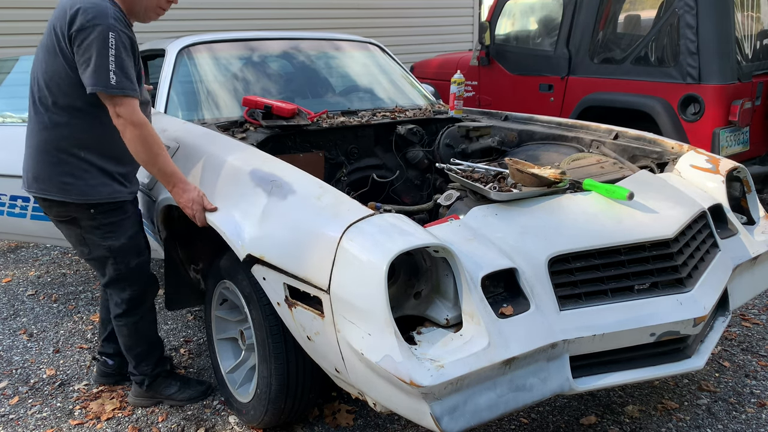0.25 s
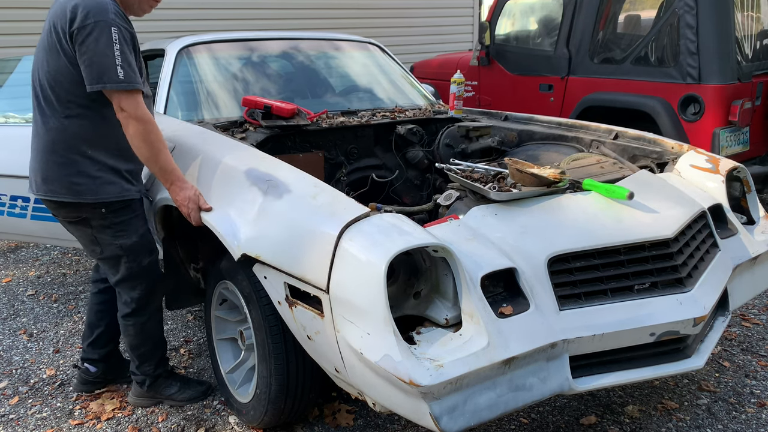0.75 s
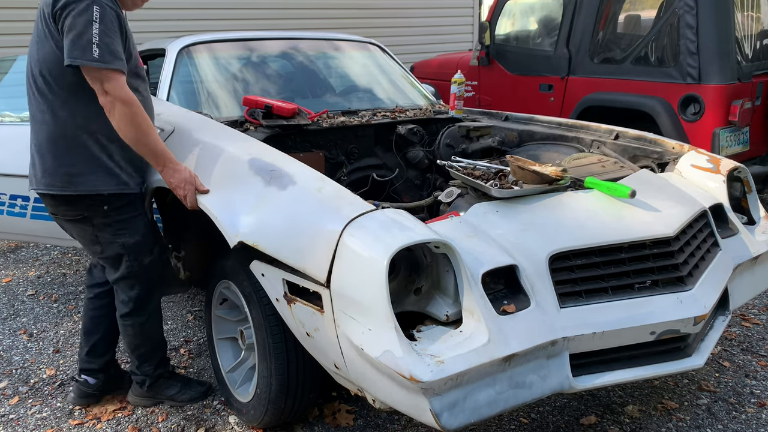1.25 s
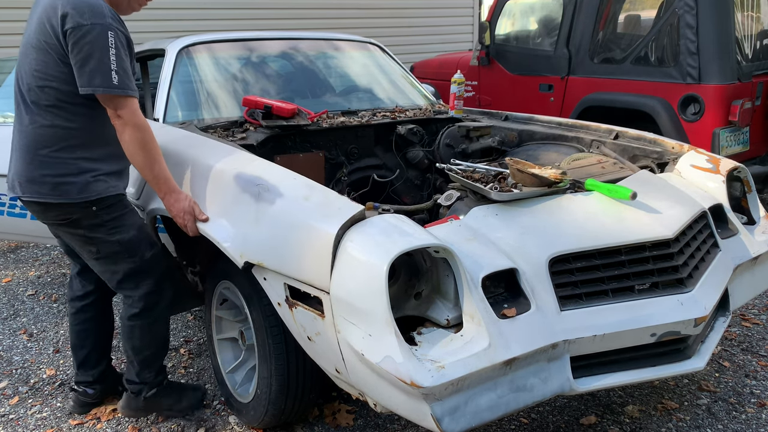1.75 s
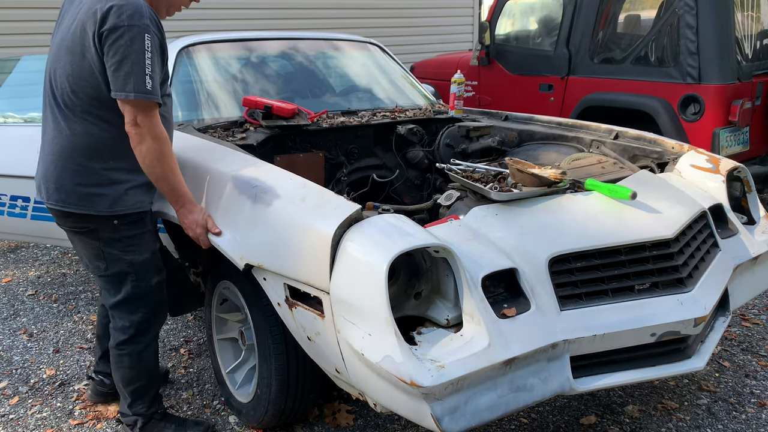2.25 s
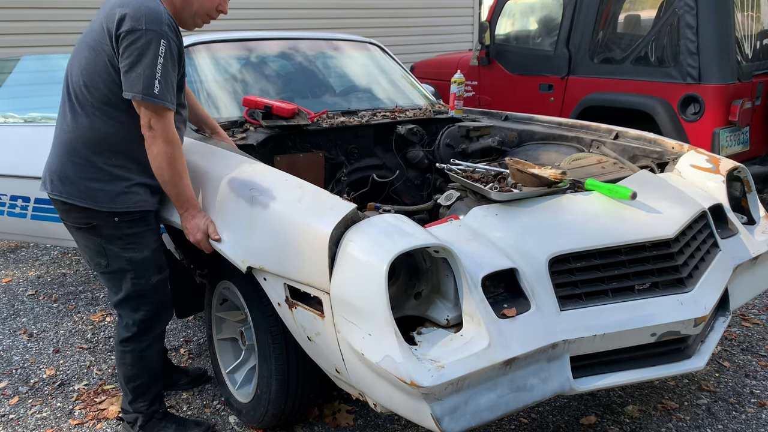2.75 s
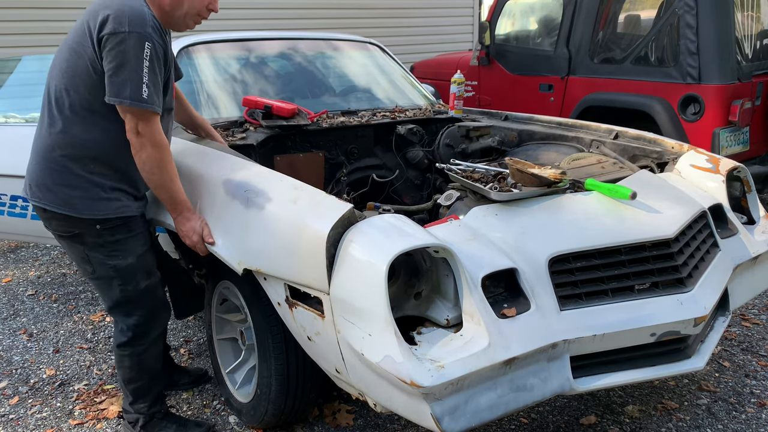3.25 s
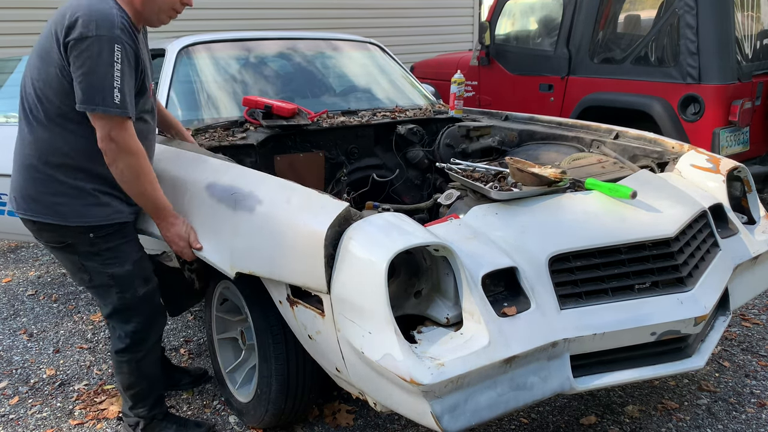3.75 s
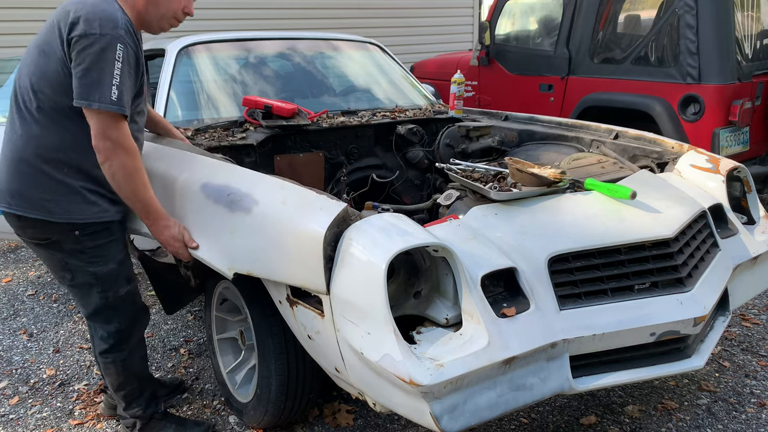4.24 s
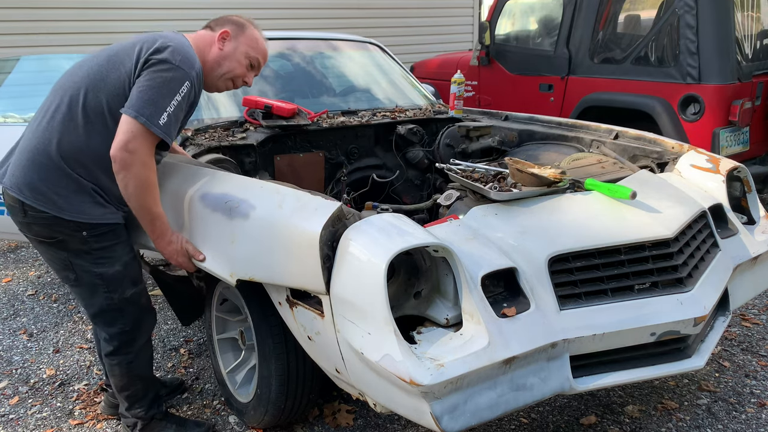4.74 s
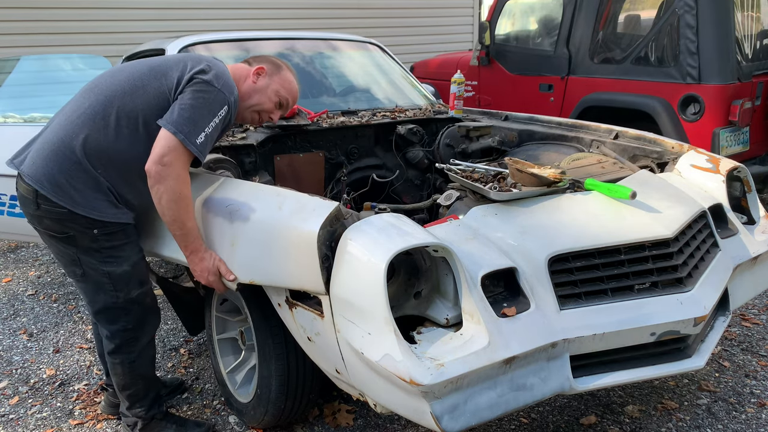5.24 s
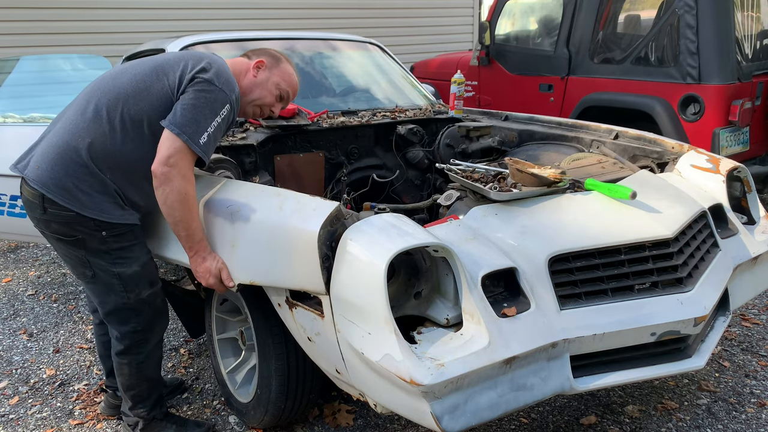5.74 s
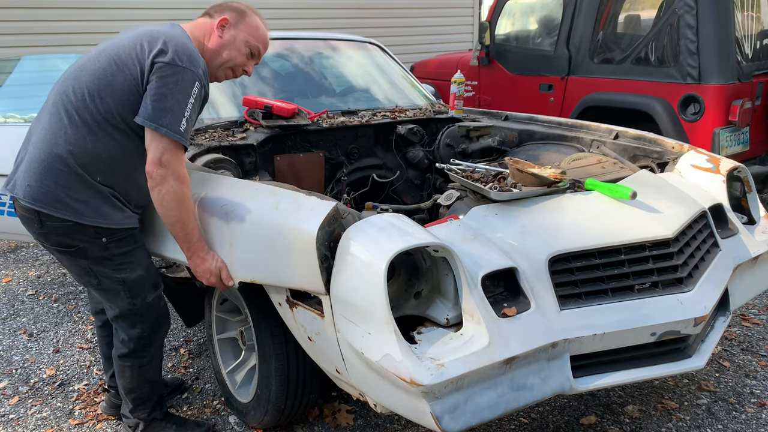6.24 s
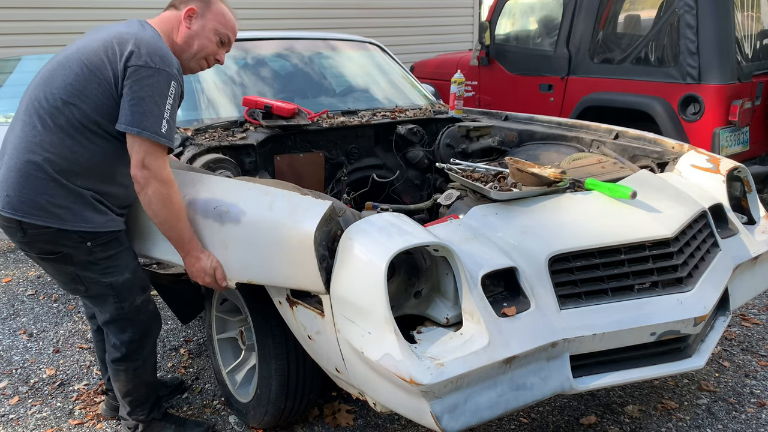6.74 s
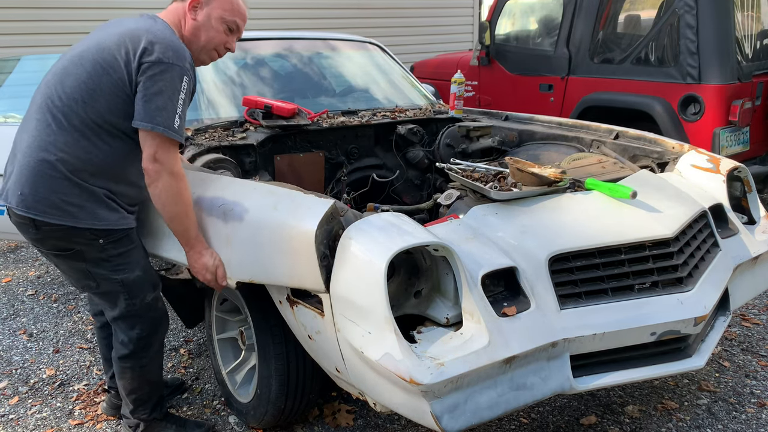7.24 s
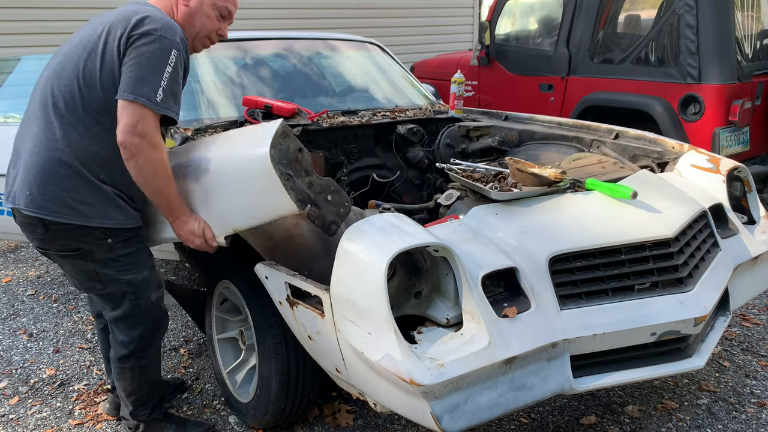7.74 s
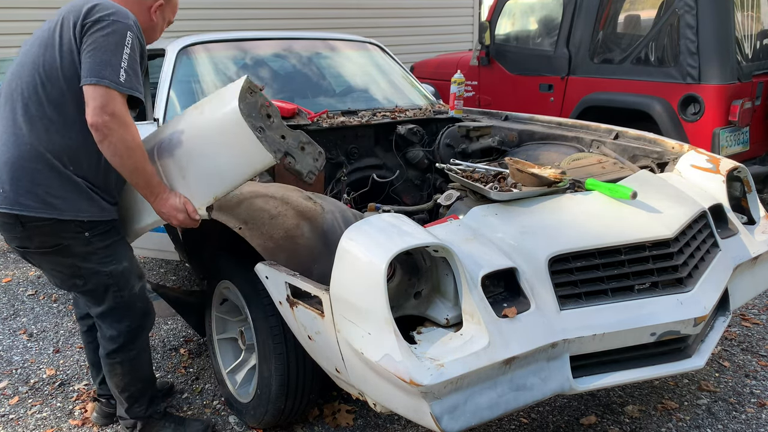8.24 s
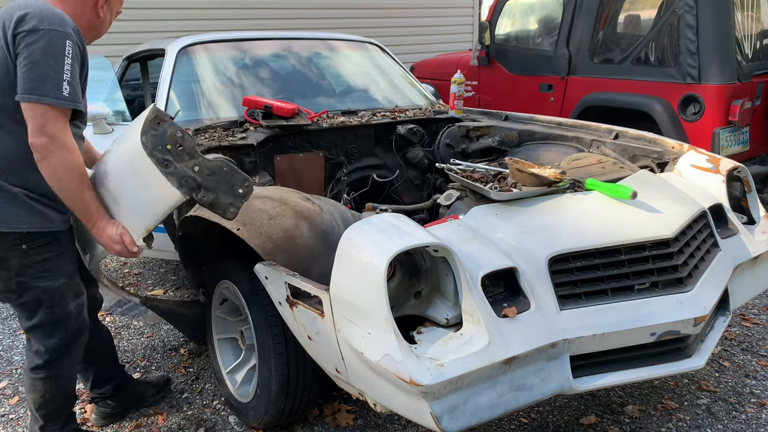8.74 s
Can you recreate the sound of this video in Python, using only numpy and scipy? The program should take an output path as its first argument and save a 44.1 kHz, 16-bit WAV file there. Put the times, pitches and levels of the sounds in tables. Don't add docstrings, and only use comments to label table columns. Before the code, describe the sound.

Rough bursts of sheet metal knocking and grating, a ratchety creak, heavy hollow thumps, then a loud final clank and faint rustles in a quiet yard.

```python
import sys
import numpy as np
from scipy import signal
from scipy.fft import rfft, irfft, next_fast_len
from scipy.io import wavfile
from scipy.ndimage import uniform_filter1d, map_coordinates

SR = 44100
rng = np.random.default_rng(int(sys.argv[2]) if len(sys.argv) > 2 else 0)


def boost_factor(decibels):
    exponent = np.asarray(decibels, float) / 20
    return 10 ** exponent


def int16_out(signal):
    q = np.round(np.clip(np.atleast_2d(signal).T, -1, 1) * 32767)
    wavfile.write(sys.argv[1], SR, q.astype(np.int16))


N = 396459
T = np.arange(N) / SR

# (f/Hz, level/dB per Hz)
STEEL = [(24, -40.5), (40, -5.5), (69, -2.5), (170, -3.5), (243, 3), (306, -2.5), (377, 1), (598, -6),
         (753, -5.5), (872, -12.5), (1170, -13.5), (2440, -22.5), (6000, -13), (7800, -72.5), (13200, -120)]
# (f/Hz, level/dB per Hz)
GRIT = [(3000, -38), (5000, -39.5), (6500, 6), (9000, 8.5), (12000, 3), (15500, 2.5), (16400, -7)]
# (f/Hz, share of the t60)
DAMPING = [(60, 1), (300, 0.56), (1500, 0.89), (5000, 0.035), (12000, 0.29)]


def unit(x):
    return x / np.sqrt(np.mean(x ** 2) + 1e-20)


def along(points, hz):
    f, v = np.transpose(points)
    return np.interp(np.log(hz + 1), np.log(f + 1), v)


def wobble(rate):
    return map_coordinates(rng.standard_normal(int(N * rate / SR) + 4), [T * rate])


def filtered(x, response):
    m = next_fast_len(x.shape[-1] + SR // 2)
    spectrum = rfft(x, m) * response(np.fft.rfftfreq(m, 1 / SR))
    return irfft(spectrum, m)[..., :x.shape[-1]]


def band(hz, lo_hz, hi_hz):
    return 1 / np.sqrt((1 + (lo_hz / (hz + 1)) ** 8) * (1 + (hz / hi_hz) ** 8))


def add_at(out, s, sound):
    out[..., round(s * SR):][..., :sound.shape[-1]] += sound


def fading(t60, gain_db, count):
    hz, t, z = signal.stft(rng.standard_normal((count, SR // 4)), SR, nperseg=256)
    z = z * boost_factor(gain_db(hz) - 60 * t / t60(hz))
    return signal.istft(z, SR, nperseg=256)[1][:, :SR // 4]


def ringing(x, t60, count, hop_s):
    hop = round(hop_s * SR)
    padded = np.pad(x, (hop, 2 * hop))
    slices = np.lib.stride_tricks.sliding_window_view(padded, 2 * hop)[::hop]
    slices = slices * signal.get_window("hann", 2 * hop)
    tails = fading(t60, lambda hz: 0, count=count * len(slices))[:, :SR // 7]
    tails = tails.reshape(count, len(slices), -1)
    tails = tails / np.linalg.norm(tails, axis=2, keepdims=True)
    wet = signal.fftconvolve(slices[None], tails, axes=2)
    out = np.zeros((count, N + SR + 3 * hop))
    for k in range(len(slices)):
        out[:, k * hop:][:, :wet.shape[2]] += wet[:, k]
    return out[:, hop:N + hop]


def grains(per_s, spread_db, bed):
    caught = rng.random(N) < per_s * boost_factor(5 * wobble(25)) / SR
    size_db = spread_db * np.minimum(rng.exponential(size=N), 2.5)
    kicks = unit(caught * boost_factor(size_db) * rng.choice([-1, 1], N))
    return unit(kicks + bed * rng.standard_normal(N))


def strokes(rows, slopes, over):
    start, hold, db, extra_db = np.transpose(rows)[:, :, None]
    up, down = slopes
    t = T[::64]
    early, late = np.maximum(start - t, 0), np.maximum(t - start - hold, 0)
    each_db = db + over * extra_db - up * early - down * late
    return np.interp(T, t, each_db.max(0))


def ahead(x):
    return filtered(x, lambda hz: np.exp(1j * np.pi * hz * np.array([[-1], [1]]) * 5 / SR))


def air():
    # (f/Hz, level/dB per Hz)
    yard = [(25, -14.5), (40, -1), (65, 6.5), (125, 4.5), (200, -7.5), (400, -17), (1000, -20.5),
            (2500, -28.5), (5500, -29), (7300, -25), (8500, -34), (12000, -39), (16000, -36)]
    # (start t/s, end t/s, f/Hz)
    cricket = (5.47, 5.85, 4095)
    shared, own = rng.standard_normal(N), rng.standard_normal((2, N))
    turn = lambda hz: np.pi / 2 * along([(150, 0.18), (700, 0.66), (2000, 1.0)], hz)
    hum = filtered(shared, lambda hz: boost_factor(along(yard, hz)) * np.cos(turn(hz)))
    hum = hum + filtered(own, lambda hz: boost_factor(along(yard, hz)) * np.sin(turn(hz)))
    start, end, hz = cricket
    swell = np.clip(np.minimum(T - start, end - T) / .1, 0, 1)
    cycles = hz * np.cumsum(1 + .03 * (swell - 1)) / SR + .17 * wobble(140)
    trill = np.sin(2 * np.pi * cycles) * boost_factor(-66 + 4 * wobble(40))
    return boost_factor(-50.5 + 1.6 * wobble(3.46)) * unit(hum) + ahead(swell * trill)


def knocks():
    # (t/s, peak level/dB, note f/Hz,
    # sharpness/dB, t60/s)
    frame_blows = [(0.041, -27, 498, -2, 0.37), (0.086, -11, 825, -26, 0.086), (0.118, -11, 380, -16, 0.27),
                   (0.291, -15, 410, -10, 0.13), (0.332, -19, 205, -26, 0.6), (0.434, -17, 635, -27, 0.63),
                   (0.467, -9, 437, -13, 0.34), (0.63, -13, 240, -11.5, 0.15), (0.673, -9, 302, -19, 0.22),
                   (0.771, -13, 336, -17.5, 0.4), (0.819, -7.5, 388, -4.5, 0.1), (0.926, -11, 630, -7.5, 0.59),
                   (1.007, -14, 425, -8, 0.13), (1.155, -23, 441, -4, 0.29), (1.181, -6, 397, -21.5, 0.47),
                   (1.243, -8.5, 356, -5.5, 0.67), (1.305, -7, 268, -10, 0.21), (1.339, -8.5, 253, -4, 0.15),
                   (1.553, -15, 334, -17, 0.27), (1.775, -24.5, 396, -18, 0.19),
                   (2.536, 0, 312, -17, 0.18), (2.59, -16, 416, -6, 0.4), (2.978, -18.5, 352, -18, 0.85),
              (2.996, -12, 264, -14.5, 0.16), (3.188, -15, 665, -18.5, 0.25),
              (3.268, -19.5, 251, -21, 0.09), (3.337, -22, 705, -17, 0.12), (3.457, -7, 256, -18, 0.2),
              (3.513, -7.5, 357, -16, 0.22), (3.591, -16, 202, -37.5, 0.79), (3.668, -18.5, 264, -19, 0.49),
              (3.699, -11, 506, -8, 0.18), (3.798, -1.5, 474, -19.5, 0.2), (3.927, -18.5, 223, -32, 0.32),
              (4.005, -16, 466, -13.5, 0.26), (4.049, -12.5, 770, -16, 0.2), (4.14, -21, 443, -27, 0.37),
              (4.337, -26.5, 1160, -25, 0.12), (4.432, -11.5, 248, -21, 0.13),
              (4.848, -30.5, 442, -6, 0.26),
                   (5.304, -14, 327, -12.5, 0.36), (6.087, 0, 227, -22, 0.18), (6.21, -10, 422, -24, 0.13),
               (6.399, -34, 250, -40, 0.04), (6.538, -18, 204, -20.5, 0.33), (7.033, -14, 344, -16, 0.5),
               (7.111, -9.5, 460, -5, 0.74), (7.14, -9, 261, -13, 0.2), (7.176, -10, 238, -19, 0.41),
               (7.361, -9, 414, -12, 0.24), (7.416, 1, 367, -8, 0.27), (7.432, 1.5, 400, -9, 0.11),
               (7.492, -16.5, 443, -5, 0.23), (7.633, -19, 843, 0, 0.14), (7.916, -32.5, 510, -17, .32),
               (8.314, -32.5, 740, -8, 0.47), (8.492, -24, 455, -13, 0.51), (8.938, -24.5, 230, -16, 0.92)]
    # (f/Hz, level/dB, t60/s)
    panel_modes = [(73.2, -16, .5), (124.2, -11.5, 0.68), (205, -9, 0.62), (274, -12.5, 0.25),
                   (318, -2.5, 0.23), (424.4, 10.5, 0.14), (485.6, -23, 0.62), (600, -8.5, 0.097),
                   (658.7, 2.5, 0.3), (774.3, -2.5, 0.31), (983, 9.5, 0.17), (1121, 1, 0.21),
                   (1148, -7, 0.49), (1283, -7, 0.14), (1544, -5.5, 0.12), (1957, -2.5, 0.37)]
    out, t = np.zeros(N + SR), T[:SR // 4]
    blows = frame_blows
    _, _, note_hz, sharp_db, t60 = np.transpose(blows)[:, :, None, None]
    crack_db = -3.5 + 1.2 * sharp_db
    near = lambda hz, centre_hz: -9 * np.abs(np.log2((hz + 1) / centre_hz))
    body = lambda hz: boost_factor(near(hz, note_hz)) * (hz < 1500)
    rasp = lambda hz: boost_factor(along(STEEL, hz) + sharp_db + 13.0) * (hz > 1400)
    crack = lambda hz: boost_factor(along(GRIT, hz) + crack_db - 12.0)
    mix = lambda hz: body(hz) + rasp(hz) + crack(hz)
    tone_db = lambda hz: 20 * np.log10(mix(hz[:, None]) + 1e-6)
    bursts = fading(lambda hz: t60 * along(DAMPING, hz)[:, None], tone_db, count=len(blows))
    hz, level_db, lasting = np.transpose(panel_modes)[:, :, None]
    draws = rng.standard_normal((len(blows), 2, len(panel_modes), 1))
    top = lambda x: x / np.abs(x).max()
    contact, rattle = 1 - np.exp(-t / [[.0015], [.004]])
    for (s, db, note, _, ring_s), burst, (strength, bend) in zip(blows, bursts, draws):
        gain_db = .5 * level_db + near(hz, note) + 4 * strength - 60 * t / (1.69 * ring_s * lasting)
        ring = (boost_factor(gain_db) * np.sin(2 * np.pi * hz * (1 + .03 * bend) * t)).sum(0)
        add_at(out, s, boost_factor(db - 4) * top(top(ring) * contact + top(burst) * rattle))
    return out[:N]


def drag():
    # (start t/s, hold/s, force level/dB, boom over it/dB)
    heaves = [(.06, 0.087, -25.5, 0), (.26, 0.15, -34, 5), (.44, 0.14, -31.5, 4.5), (.62, 0.22, -30, 1),
              (.93, 0.12, -29.5, -4.5), (1.17, 0.14, -25, 1.5), (1.4, 0.06, -27.5, 0.5),
              (1.54, 0.021, -32, 4.5), (1.7, 0.17, -48, 4), (2.1, 0.065, -48, 2.5), (2.39, 0.15, -46.5, -7),
              (2.55, 0.033, -32.5, 5.5), (2.72, 0.14, -51.5, 8.5), (2.98, 0.11, -41.5, 4.5),
              (3.18, 0.13, -40.5, 4.5), (3.48, 0.053, -25, -2.5), (3.66, 0.095, -35.5, 1.5),
              (4.0, 0.063, -31, 3), (4.2, 0.11, -43, 2.5), (4.44, 0.022, -37.5, -2), (5.31, 0.11, -54.5, 7),
              (5.92, 0.17, -52.5, 4.5), (6.115, 0.028, -28.5, -3), (6.21, 0.015, -33, 2),
              (6.36, 0.17, -45.5, -2.5), (6.52, 0.24, -45, 3), (7.065, 0.2, -33, -1.5),
              (7.44, 0.051, -37, 7), (7.57, 0.14, -34.5, -9), (7.9, 0.17, -44.5, -7),
              (8.48, 0.039, -46, -20), (8.77, 0.056, -51.5, -25)]
    # (start t/s, hold/s, rasp level/dB, grit over it/dB)
    scrapes = [(.07, 0.07, -41, -1.5), (.27, 0.045, -43.5, -9.5), (.44, 0.016, -35.5, -5.5),
               (.56, 0.2, -48, -9), (.76, 0.089, -40.5, -4.5), (1.0, 0.038, -41, -12),
               (1.17, 0.25, -37, -2.5), (1.44, 0.11, -46.5, -6), (1.93, 0.01, -59.5, -1),
               (2.11, 0.032, -74, -8), (2.24, 0.1, -55.5, 0.5), (2.45, 0.066, -41, 3.5),
               (2.98, 0.048, -47, -4), (3.18, 0.24, -55.5, -11), (3.47, 0.082, -38, -10.5),
               (3.67, 0.013, -30, -11), (3.86, 0.11, -49.5, -2), (4.0, 0.13, -42.5, -8),
               (4.28, 0.16, -51.5, -7), (5.93, 0.17, -54, -2.5), (6.09, 0.031, -37.5, -9),
               (6.32, 0.048, -45.5, -40), (6.53, 0.18, -50.5, -11), (7.07, 0.11, -39, -13),
               (7.345, 0.016, -46, -5), (7.44, 0.043, -52, -2), (7.56, 0.017, -38.5, -10.5),
               (7.605, 0.023, -52, -3), (7.77, 0.01, -48.5, -2), (7.98, 0.084, -55.5, -3),
               (8.36, 0.2, -57, 4.5), (8.8, 0.23, -59, 1.5)]
    panel_db = strokes(heaves, (264, 123), False)
    boom_db = strokes(heaves, (150, 86), True)
    rasp_db = strokes(scrapes, (370, 110), False)
    grit_db = strokes(scrapes, (320, 143), True)
    catches = grains(300, spread_db=3.5, bed=0.33)
    steel = lambda x, lo, hi: unit(filtered(x, lambda hz: boost_factor(along(STEEL, hz)) * band(hz, lo, hi)))

    flex = steel(rng.standard_normal(N), 52, 166)
    boom = unit(0.72 * steel(catches, 52, 165) + flex)
    force = boost_factor(boom_db - 1.5) * boom + boost_factor(panel_db) * steel(catches, 224, 1340)
    sheet = ringing(force, lambda hz: .08 * along(DAMPING, hz)[:, None], count=1, hop_s=.15)[0]

    rub = filtered(rng.standard_normal(N), lambda hz: 2 * band(hz, 1600, 3680))
    rasp = boost_factor(rasp_db + 4.33 * wobble(40)) * unit(steel(catches, 740, 3560) + rub)

    grit = unit(.2 * catches + grains(500, spread_db=5, bed=2.5))
    hiss = unit(filtered(grit, lambda hz: boost_factor(along(GRIT, hz))))
    return sheet + rasp + boost_factor(grit_db + 5.33 * wobble(45)) * hiss


def snags():
    # (t/s, peak level/dB, note f/Hz, t60/s)
    catches = [(0.085, -16, 367, 0.073), (0.233, -25, 340, 0.09), (0.353, -19, 296, 0.075),
               (0.394, -27, 440, 0.12), (0.432, -19, 630, 0.066), (0.468, -9, 439, 0.093),
               (0.489, -6, 783, 0.065), (0.556, -17, 415, 0.09), (0.632, -14, 826, 0.064),
               (0.701, -15.5, 336, 0.099), (0.738, -28, 503, 0.1), (0.802, -10, 389, 0.096),
               (0.85, -14.5, 596, 0.065), (0.927, -13.5, 618, 0.07), (0.982, -19.5, 530, 0.09),
               (1.007, -10.5, 398, 0.092), (1.136, -22.5, 452, 0.1), (1.157, -13, 452, 0.078),
               (1.2, -12, 450, 0.067), (1.246, -6, 380, 0.084), (1.27, -15, 440, 0.051),
               (1.304, -11, 667, 0.066), (1.33, -14, 440, 0.065), (1.424, -22, 482, 0.097),
               (1.463, -25, 310, 0.068), (3.191, -22.5, 1010, 0.059), (3.516, -21, 373, 0.09),
               (3.538, -18, 320, 0.11), (3.655, -19.5, 307, 0.11), (4.005, -29, 447, 0.082),
               (4.069, -17.5, 997, 0.11), (4.148, -18.5, 818, 0.081), (5.303, -16.5, 332, 0.083),
               (6.102, -9, 310, 0.096), (6.212, -18, 712, 0.09), (7.032, -14, 392, 0.086),
               (7.189, -12, 392, 0.09), (7.368, -18, 397.7, 0.13), (7.449, -8.5, 396, 0.11),
               (7.564, -20, 313, 0.11), (7.611, -19, 324, 0.09), (7.63, -18, 944, 0.06),
               (7.653, -18, 945, 0.11)]
    # (multiple of the note, level/dB)
    lip = [(1, 0.5), (1.53, -6.5), (2.31, -10.5), (3.4, -15.5), (5.2, -21)]
    out, t = np.zeros(N + SR), T[:SR // 5]
    times, level_db = np.transpose(lip)[:, :, None]
    draws = rng.standard_normal((len(catches), 2, len(lip), 1))
    for (s, db, hz, t60), (bend, strength) in zip(catches, draws):
        stretch = times * (1 + 0.068 * bend * (times > 1))
        gain_db = level_db + 3 * strength - 60 * t * np.sqrt(times) / t60
        ring = (boost_factor(gain_db) * np.sin(2 * np.pi * hz * stretch * t)).sum(0)
        add_at(out, s, boost_factor(db - 5.5) * ring * (1 - np.exp(-t / 0.00098)))
    return out[:N]


def crunches():
    # (start t/s, hold/s, level/dB, grit over it/dB)
    crushes = [(.09, 0.075, -41, -13), (.29, 0.0095, -50, -17), (.465, 0.037, -35, -11.5),
               (.635, 0.013, -48.5, 0.5), (.69, 0.016, -44, -6), (.77, 0.035, -39, -1.5),
               (.855, 0.018, -37.5, -8), (.93, 0.046, -39.5, -11), (1.005, 0.015, -41, -9.5),
               (1.19, .025, -30, -8), (1.25, 0.035, -31, -9), (1.31, 0.044, -29.5, -16.5),
               (1.378, 0.0092, -36, -15), (1.47, 0.015, -42, -10), (3.46, .03, -39.5, -12),
               (3.52, 0.04, -40.5, -8), (3.81, 0.012, -40, -10), (4.01, 0.011, -36.5, -11.5),
               (4.04, 0.044, -36.5, -12), (6.075, 0.05, -35, -5), (6.215, 0.014, -48, -18),
               (7.04, 0.048, -42.5, -2.5), (7.11, 0.059, -35, -7.5), (7.365, 0.011, -35, -6),
               (7.445, 0.019, -35.5, -8), (7.49, 0.02, -33, -5), (7.622, 0.022, -28, -1),
               (7.655, 0.018, -32, -8), (6.685, 0.025, -51, -25), (7.2, 0.088, -45.5, -5.5),
               (8.22, 0.008, -67, 0), (8.32, 0.13, -64, 0.5), (8.61, 0.041, -56.5, -3),
               (8.49, .05, -45, -3)]
    # (dB per s up, dB per s down)
    slopes = (800, 640)
    rust = grains(550, spread_db=5, bed=.35)
    dull = lambda hz: boost_factor(-5 * np.log2(hz / 1000 + 0.32))
    body = unit(filtered(rust, lambda hz: band(hz, 900, 5500) * dull(hz)))
    hiss = unit(filtered(rust, lambda hz: boost_factor(along(GRIT, hz))))
    low_db, high_db = strokes(crushes, slopes, False), strokes(crushes, slopes, True)
    return boost_factor(3.0 * wobble(90)) * (boost_factor(low_db) * body + boost_factor(high_db) * hiss)


def ticks():
    # (t/s, peak level/dB, body level over it/dB)
    snaps = [(0.5567, -21.5, 7.5), (0.759, -25, 15), (0.927, -10.5, -15), (1.2466, -9, -30.5),
             (1.3078, -4.5, 2), (1.377, -12.5, -4), (1.766, -33, 8.5), (1.936, -31.5, -5),
             (2.0941, -26.5, 2), (2.111, -32, 1), (2.141, -27, 0), (2.157, -32.5, 3), (2.422, -17.5, -0.5),
             (3.454, -17.5, 10), (3.4658, -17, -15), (3.516, -15, -18), (3.6714, -20, 7),
             (5.258, -32, -10), (5.872, -30.5, -2), (5.929, -36, 3), (6.083, -16, 6), (7.0423, -18.5, -7),
             (7.112, -19.5, 14.5), (7.3433, -16.5, -20), (7.3707, -31, -34), (7.4169, -0.5, -0.5),
             (7.4345, -10, 9.5), (7.6016, -23, -17), (7.632, -25, 2), (7.9882, -29.5, -20)]
    parts, t = np.zeros((2, N + SR)), T[:SR // 20]
    shape = boost_factor(-60 * t / .028) * (1 - np.exp(-t / .003))
    for (s, db, body_db), noise in zip(snaps, rng.standard_normal((len(snaps), len(t)))):
        add_at(parts, s, boost_factor([[db - 4.5], [db + body_db]]) * noise * shape)
    tones = lambda hz: np.array([boost_factor(along(GRIT, hz)), band(hz, 1000, 4350)])
    return filtered(parts[:, :N], tones).sum(0)


def creaks():
    # (start t/s, end t/s, slips per s, ring f/Hz, level/dB)
    rubs = [(1.903, 1.919, 57, 1346, -42), (1.258, 1.28, 700, 3200, -38), (1.376, 1.386, 800, 3130, -35),
            (4.062, 4.084, 800, 3330, -41), (4.035, 4.05, 790, 3240, -38), (4.132, 4.147, 1050, 3260, -37),
            (7.624, 7.66, 700, 2200, -33), (4.548, 4.645, 500, 2110, -60), (6.35, 6.46, 1400, 2660, -53),
            (6.498, 6.726, 540, 573, -41), (6.655, 6.717, 540, 1150, -42.5)]
    # (t/s, f/Hz, level/dB, t60/s)
    pings = [(2.17, 1400, -58, .6), (2.72, 428, -50, 1.2), (4.436, 205, -25, .45), (5.31, 652, -33, .5),
             (7.033, 392, -19, .12), (7.05, 125, -20, .2), (6.095, 205, -18, .5), (6.09, 79, -21, .6),
             (6.09, 122, -23, .5), (6.235, 320, -27, .35), (6.105, 1950, -32, .2), (6.645, 612, -39, .7),
             (7.165, 208, -22, .7), (6.213, 640, -19, .1), (7.228, 1395, -32, .4), (7.655, 975, -25, .28),
             (8.94, 1437, -43, 3)]
    resonances = [(.65, .2, .3), (1.04, .05, 1)]
    out, t = np.zeros(N + SR), T[:SR // 2]
    for start, end, per_s, ring_hz, db in rubs:
        during = t < end - start
        pace = per_s * boost_factor(1.7 * wobble(60)[:len(t)])
        kicks = np.diff(np.ceil(np.cumsum(pace * during) / SR), prepend=0)
        kicks *= boost_factor(2 * rng.standard_normal(len(t))) * rng.choice([-1, 1], len(t))
        skirt = lambda f: band(ring_hz * f, .5 * ring_hz, 1.6 * ring_hz)
        peaks = lambda f: sum(g * 1j * f * w / (k * k - f * f + 1j * f * w) for k, w, g in resonances)
        creak = unit(filtered(kicks, lambda hz: skirt(hz / ring_hz) * peaks(hz / ring_hz)))
        add_at(out, start, boost_factor(db) * creak * np.sqrt(during.mean()))
    for s, hz, db, t60 in pings:
        ping = boost_factor(db - 60 * t / t60) * np.sin(2 * np.pi * hz * t) * (1 - np.exp(-t / 0.0033))
        add_at(out, s, ping * np.cos(np.pi * t) ** 2)
    return out[:N]


def slips():
    # (t/s, level/dB)
    slow = [(2.0945, -33), (2.111, -33), (2.1245, -37), (2.1417, -33), (2.1567, -33)]
    fast = [(2.421, -27), (2.431, -32), (2.438, -27), (2.444, -34), (2.453, -31), (2.459, -29),
            (2.468, -29), (2.474, -29), (2.479, -31), (2.484, -30), (2.489, -27), (2.4945, -23),
            (2.499, -22), (2.504, -23), (2.508, -24), (2.514, -27)]
    # (f/Hz, level/dB, t60/s)
    slack = [(996, 0, .028), (1350, 3, .028), (1660, 2, .028), (2370, -9, .02), (5560, -12, .02)]
    taut = [(985, -4, .02), (1380, 4, .024), (1640, 7, .024), (1850, 0, .02)]
    out, t = np.zeros(N + SR), T[:SR // 20]
    for rows, modes, rise_s in (slow, slack, .0004), (fast, taut, .0015):
        hz, level_db, t60 = np.transpose(modes)[:, :, None]
        ring = (boost_factor(level_db - 60 * t / t60) * np.sin(2 * np.pi * hz * t)).sum(0)
        ring *= 1 - np.exp(-t / rise_s)
        for s, db in rows:
            add_at(out, s, boost_factor(db) * ring)
    return out[:N]


def wall(x):
    # (f/Hz, t60/s)
    lasting = [(100, 0.52), (1000, 0.22), (8000, 0.15)]
    # (f/Hz, level/dB)
    wet = [(60, -24), (400, -11), (1500, -5), (4000, -2)]
    late = np.pad(x, (200, 0))[:N]
    echo = ringing(late, lambda hz: along(lasting, hz)[:, None], count=2, hop_s=.11)
    return filtered(echo, lambda hz: boost_factor(along(wet, hz)))


def scene():
    panel = drag() + knocks() + ticks() + snags() + crunches()
    bracket = creaks() + slips()
    lean_db = [(60, -2.2), (300, -2.0), (800, 1.7), (2500, -2.5)]  # (Hz, dB left over right)
    ports = lambda hz: boost_factor(np.array([[.5], [-.5]]) * along(lean_db, hz))
    return filtered(panel, ports) + ahead(bracket) + wall(panel + .4 * bracket) + air()


def thinned(pair):
    hz, _, z = signal.stft(pair, SR, nperseg=2048)
    power = np.abs(z) ** 2
    local = uniform_filter1d(power, size=14, axis=1)
    whim_db = np.repeat(rng.standard_normal((2, 33, z.shape[2])), 32, axis=1)[:, :len(hz)]
    heard = (local > local[::-1] * boost_factor(-18 + 6 * whim_db)) | (hz < 5500)[:, None]
    strong = (power > local * boost_factor(-14 + 7 * whim_db)) | (hz < 1200)[:, None]
    return signal.istft(z * heard * strong, SR, nperseg=2048)[1][:, :N]


def top_cut(x):
    return signal.sosfilt(signal.butter(12, 16510, fs=SR, output="sos"), x)


def record(dry):
    lead = lambda hz: np.exp(1j * np.pi * hz * np.array([[1], [-1]]) * 6.2 / SR)
    ports = filtered(dry, lambda hz: band(hz, 37, 5900) ** 2 * band(hz, 1, 6300) ** 3 * lead(hz))
    half_lag = lambda hz: np.pi * hz / 4640
    treble = lambda hz: band(hz, 5500, 16000) ** 2 * (hz < 16400)
    split = lambda hz: np.array([np.cos(half_lag(hz)), -1j * np.sin(half_lag(hz))])
    pair = filtered(dry, lambda hz: treble(hz) * split(hz))
    scattered = filtered(np.roll(dry[1], 150), lambda hz: band(hz, 3300, 10500) ** 2)
    pair[0] += np.interp(T, [7.65, 7.85], [.22, .7]) * scattered
    mid, side = thinned(pair + np.array([ports[0] + ports[1], ports[0] - ports[1]]) / 2)
    x = np.array([mid + side, mid - side])
    x = x / (1 + np.abs(x / 1.1) ** 8) ** (1 / 8)
    return top_cut(x)


dry = scene()
out = record(dry)
int16_out(out)
```